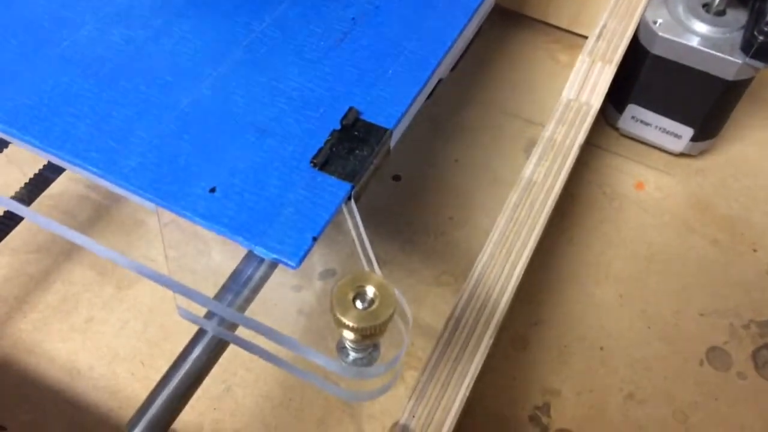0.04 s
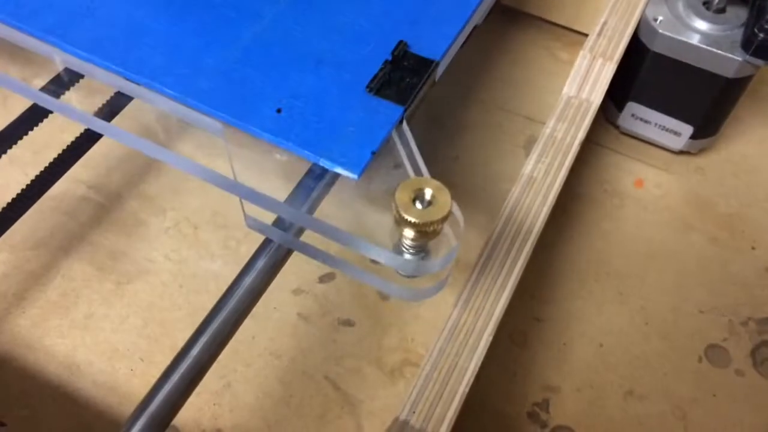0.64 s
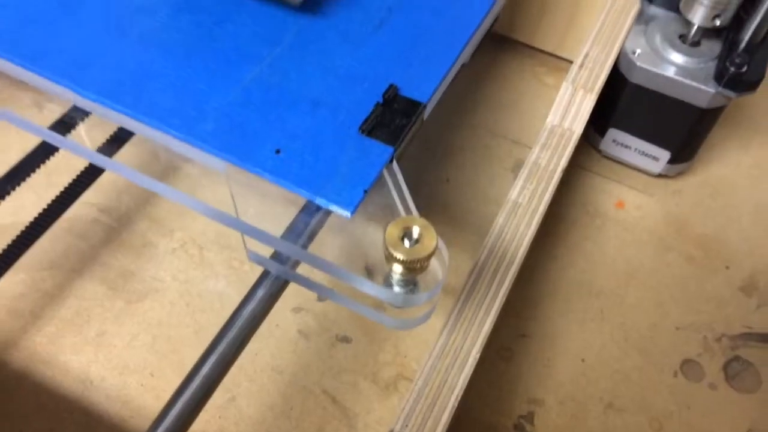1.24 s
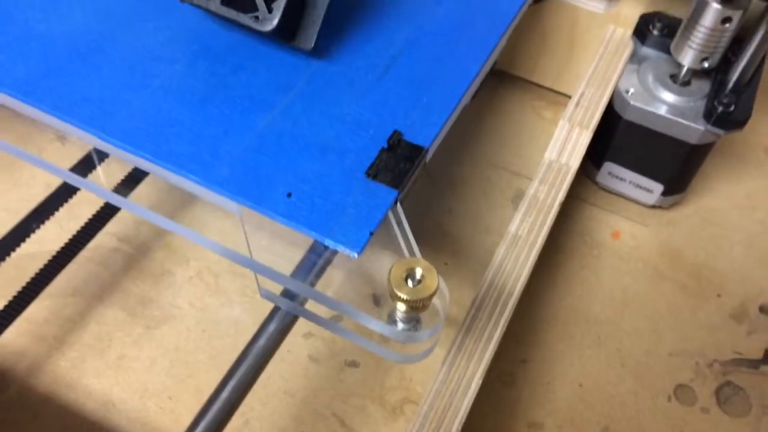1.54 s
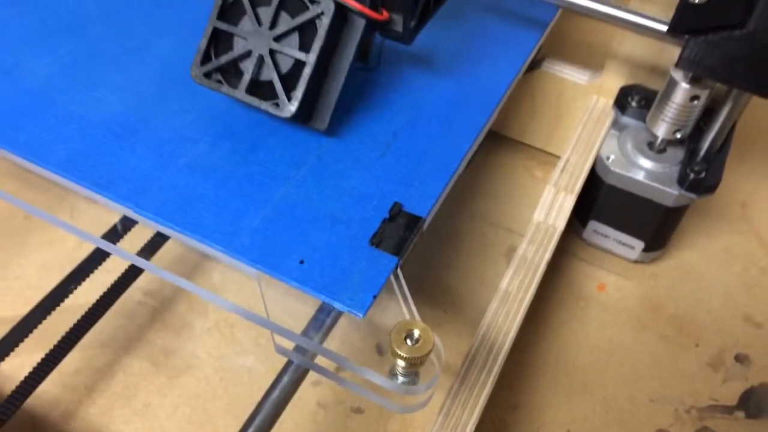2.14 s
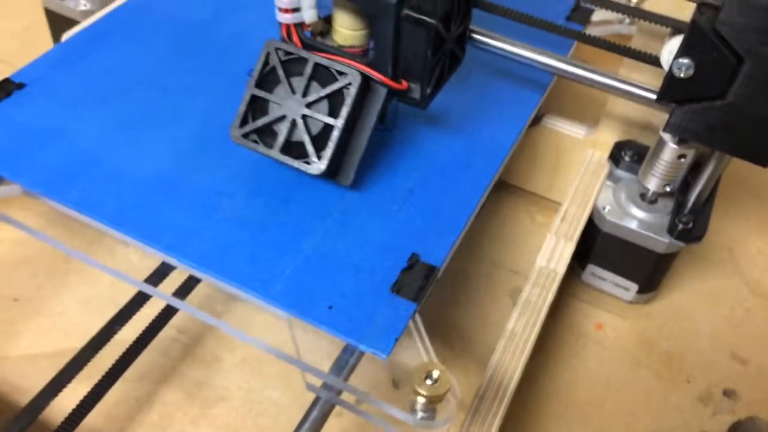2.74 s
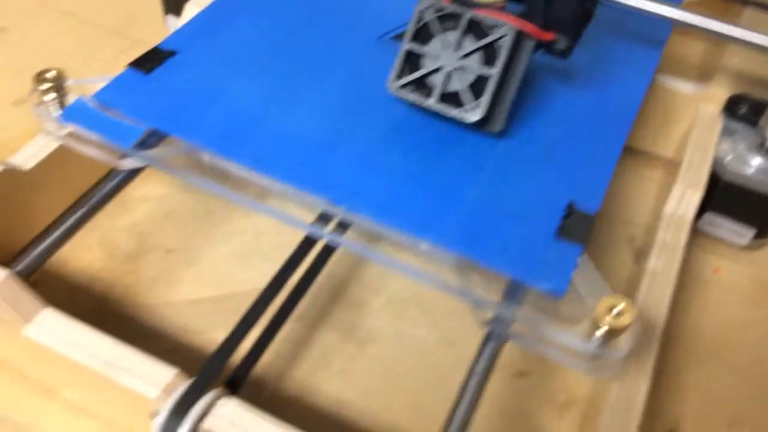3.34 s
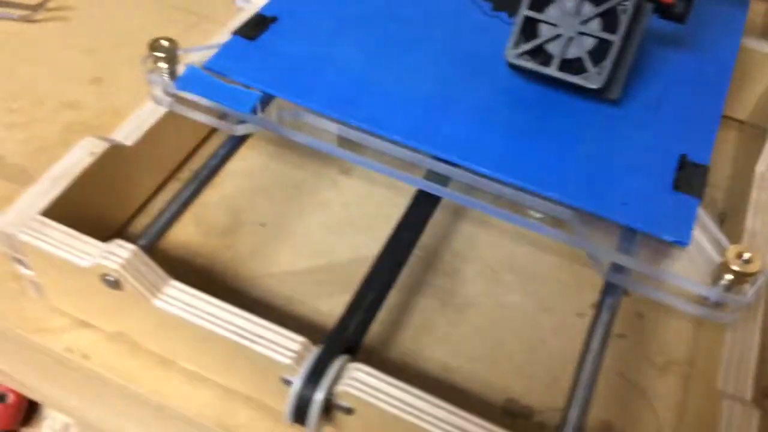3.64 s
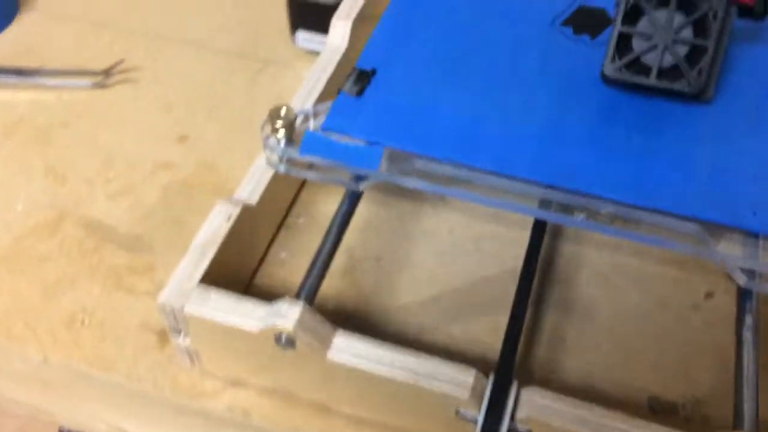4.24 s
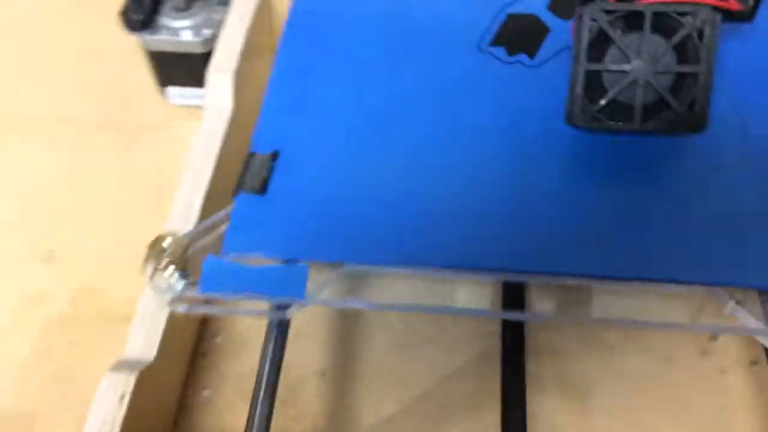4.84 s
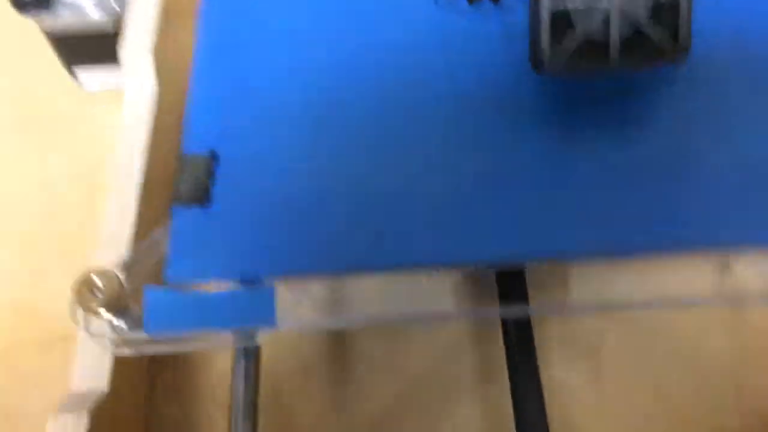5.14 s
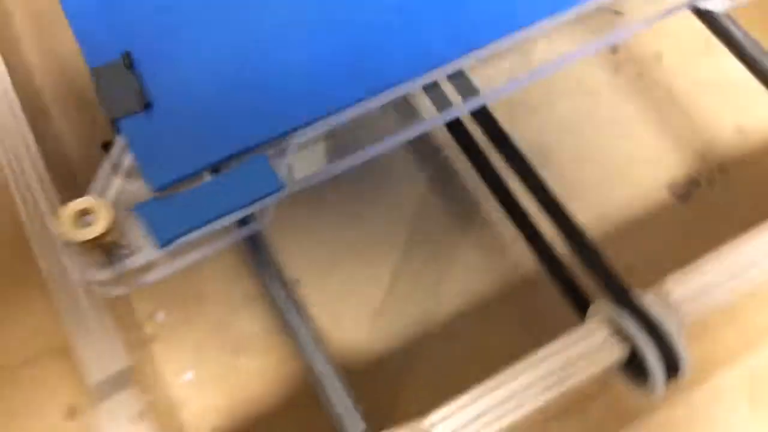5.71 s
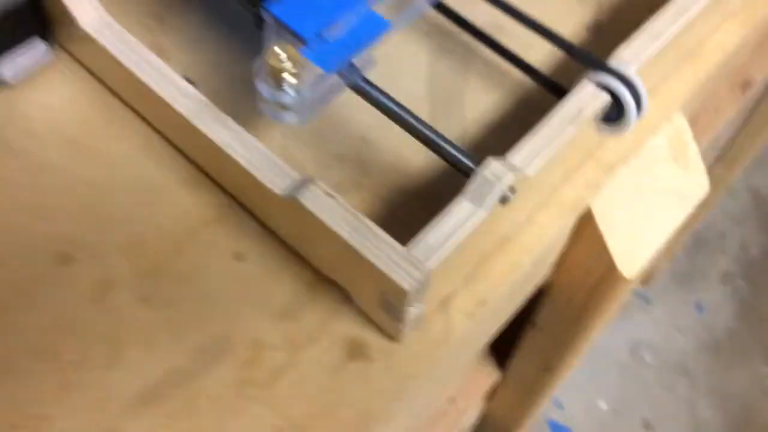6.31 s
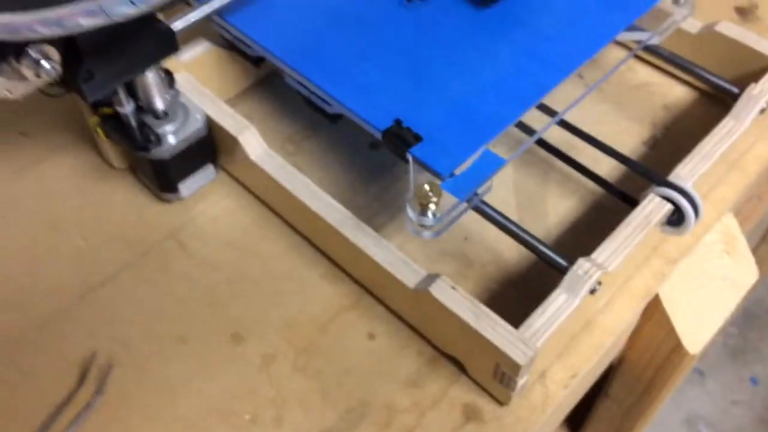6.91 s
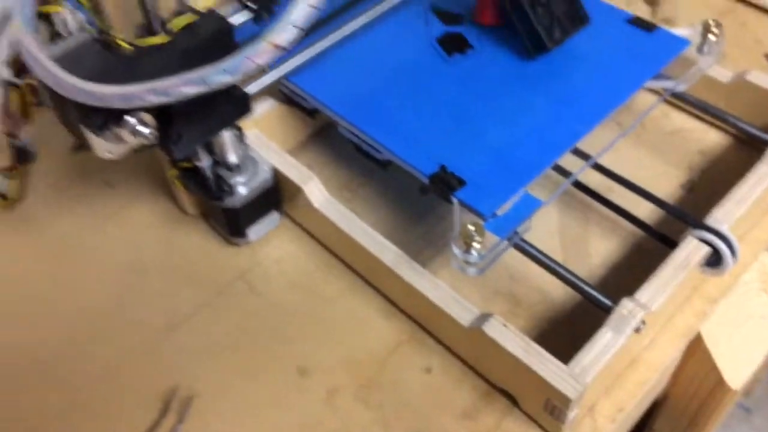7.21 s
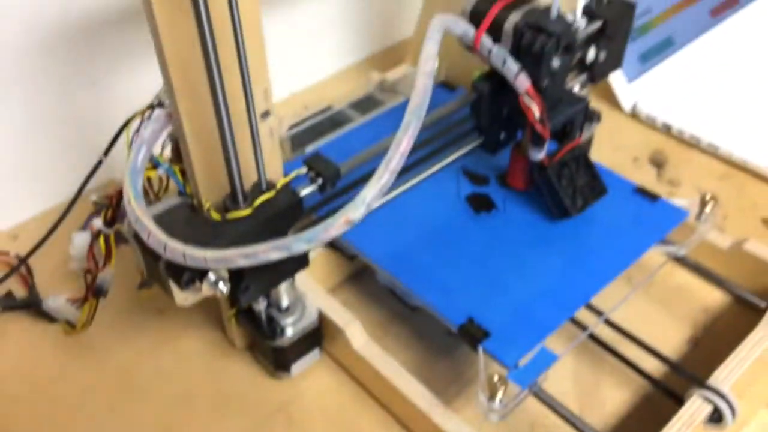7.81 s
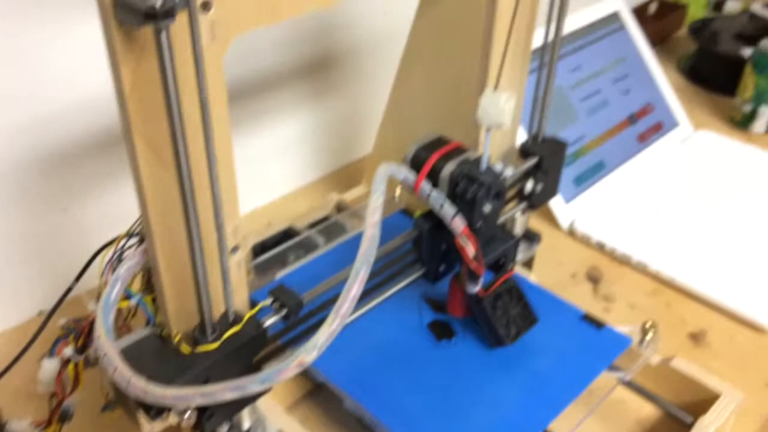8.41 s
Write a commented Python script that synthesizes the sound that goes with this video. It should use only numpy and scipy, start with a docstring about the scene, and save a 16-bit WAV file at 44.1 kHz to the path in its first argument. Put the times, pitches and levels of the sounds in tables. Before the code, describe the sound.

A 3D printer buzzes briefly, then its motors whine and hum in lengthening strokes with small knocks over a whistling fan.

```python
"""A home-built 3D printer buzzes through one fast move, then whines and hums in ever longer strokes.
Its motors turn in tiny steps: the steps make the whine, their unevenness makes the hum, and every
corner jolts the plywood frame. A small fan whistles throughout, and the motor coils join in.
Something in the workshop scrapes once and later clatters. The sounds swell and fade over a soft
rumble as the microphone is carried around the printer."""
import sys
import numpy as np
from scipy import signal
from scipy.fft import rfft, irfft, next_fast_len
from scipy.io import wavfile

SR = 44100
rng = np.random.default_rng(int(sys.argv[2]) if len(sys.argv) > 2 else 0)


def int16_out(signal):
    """Quantize to a 16-bit WAV file."""
    q = np.round(np.clip(np.atleast_2d(signal).T, -1, 1) * 32767)
    wavfile.write(sys.argv[1], SR, q.astype(np.int16))


N = 377496
TIME = np.arange(N) / SR

# How the motor whine swells and fades as the listener moves: time_s, level_db
WHINE_LEVELS = [(1.4, -43.5), (3.2, -47.5), (3.5, -51.5), (3.65, -57.5), (4.4, -50.5), (5.85, -41.5),
                (6.9, -48), (7.35, -46), (8.1, -57.5), (8.45, -53.5)]
# Strokes end by turns in a sideways hop (corner 0) and a plain reversal (corner 1), each with a pause.
PAUSES_S = (.05725, .04617)


def amp(db):
    """Turns decibels into a number to multiply a sound by."""
    return np.exp(np.asarray(db) * np.log(10) / 20)


def unit(x):
    """Scales a sound to an average strength (rms) of 1."""
    return x / np.sqrt(np.mean(x ** 2) + 1e-20)


def curves(rows):
    """Joins a table's points with straight lines: one curve for each column after the time."""
    times, *columns = np.transpose(rows)
    return [np.interp(TIME, times, column) for column in columns]


def value_at(points, hz):
    """Looks up a pitch in a table, blending between rows on a musical (log) scale."""
    pitches, values = np.transpose(points)
    return np.interp(np.log(hz + 1), np.log(pitches + 1), values)


def noise(colour):
    """Noise of strength 1; its colour says how strong the pitches are next to each other."""
    size = next_fast_len(N)
    spectrum = rfft(rng.standard_normal(N), size)
    gains = amp(value_at(colour, np.fft.rfftfreq(size, 1 / SR)))
    return unit(irfft(spectrum * gains, size)[:N])


def drift(rate_hz):
    """A random wobble of strength 1, up to about the given speed."""
    stride = 32
    white = rng.standard_normal(N // stride + 2)
    hz = np.fft.rfftfreq(len(white), stride / SR)
    slow = irfft(rfft(white) / (1 + (hz / rate_hz) ** 2), len(white))
    return unit(np.interp(np.arange(N) / stride, np.arange(len(slow)), slow))


def angle(hz):
    """The growing angle (phase) whose sine is a tone of this pitch."""
    return 2 * np.pi * np.cumsum(hz * np.ones(N)) / SR


def gate(start, end, ramp_s):
    """Switches on between two times, with short fades."""
    return np.clip(np.minimum(TIME - start, end - TIME) / ramp_s + .5, 0, 1)


def add(mix, start_s, sound):
    """Mixes a sound in at a given time."""
    part = mix[round(start_s * SR):][:len(sound)]
    part += sound[:len(part)]


def room(x, echo_db):
    """Adds the workshop's echo, in which each pitch dies away at its own speed."""
    # Time the echo takes to fall by 60 dB: pitch_hz, fade_s
    fade_times = [(100, 0.5), (500, 0.38), (2000, 0.3), (6000, 0.38), (14000, 0.31)]
    hz, t, spectrum = signal.stft(rng.standard_normal(SR // 2), SR, nperseg=256)
    fade = amp(-60 * t / value_at(fade_times, hz)[:, None])
    tail = signal.istft(spectrum * fade, SR, nperseg=256)[1]
    tail[:SR // 300] = 0  # the echo arrives a moment late
    return x + amp(echo_db) * signal.fftconvolve(x, tail / np.linalg.norm(tail))[:N]


def rumble(steady_db=-64.5, rise_s=.03, fade_s=.9):
    """Carrying the microphone makes a deep, soft noise with a few bumps."""
    # Handling bumps: start_s, level_db
    bumps = [(5.15, -59), (5.3, -53), (6.08, -52), (6.83, -56), (7.28, -53)]
    level = amp(steady_db)
    for start, db in bumps:
        t = np.maximum(TIME - start, 0)
        level = level + np.minimum(t / rise_s, 1) * amp(db - 60 * t / fade_s)
    return level * noise([(20, -36), (60, 1.5), (120, -3.0), (400, -17.5), (3000, -74)])


def air(swell_db=0.93):
    """Air rushes through the fan, with a fine hiss on top."""
    # Loudness of the moving air: time_s, rush_db, hiss_db
    air_levels = [(0, -48.5, -62.5), (3.8, -53.5, -63.5), (5.3, -53, -61.5), (6.25, -52, -64.5),
                  (6.8, -55.5, -65.5), (8.5, -56, -65.5)]
    # Colour of the rush: pitch_hz, level_db
    rush_colour = [(25, -43), (45, -20), (65, -1.5), (110, 3), (220, 7.5), (330, -2.5), (780, -7),
                   (1000, -5.5), (1900, -4.5), (2800, -8.5), (3700, -10.5), (4400, -20), (15000, -45)]
    # Colour of the hiss: pitch_hz, level_db
    hiss_colour = [(1500, -41), (4000, 3.5), (5500, 0.5), (7000, -1), (10000, -1.5), (13000, -3),
                   (15500, -9)]
    rush_db, hiss_db = curves(air_levels)
    rush = amp(rush_db + swell_db * drift(8.9)) * noise(rush_colour)
    hiss = amp(hiss_db + drift(16)) * noise(hiss_colour)
    return rush + hiss


def rubs(pitch_hz=2400, sag_hz=219.7, width_hz=100, waver_hz=40):
    """Faint rubbing: a narrow band of noise that sinks in pitch during each rub."""
    # Rubs: start_s, length_s, level_db
    rub_events = [(0.99, .12, -50), (6.602, 0.32, -61), (7.202, 0.39, -60.5), (7.7, 0.58, -61),
                  (8.279, .5, -60)]
    level, hz = np.zeros(N), pitch_hz + waver_hz * drift(14)
    for start, length, db in rub_events:
        progress = np.clip((TIME - start) / length, 0, 1)
        level += amp(db) * np.sin(np.pi * progress)
        hz -= sag_hz * progress * (progress < 1)
    phase = angle(hz)
    return level * (drift(width_hz) * np.sin(phase) + drift(width_hz) * np.cos(phase))


def electronics(whistle_hz=3919.3):
    """The powered motor coils whistle at one pitch, and thin, high tones sound above it."""
    # The whistle jumps up as the motors take a new position: time_s, level_db
    whistle_levels = [(1.04, -77), (1.06, -64), (2.95, -57.5), (3.4, -65), (3.7, -80), (5.0, -59.5),
                      (7.25, -70), (8.45, -67)]
    # Thin high tones, the lowest at seven times the blade pitch: pitch_hz, level_db
    thin_tones = [(6783, -82), (11760, -89), (12021, -88), (14195, -86)]
    phase = angle(whistle_hz)
    whistle = amp(4 + 0.26 * drift(8.7)) * np.sin(phase)
    whistle += amp(-15 + 0.84 * drift(1.5)) * np.sin(2 * phase)
    thin = sum(amp(db + 2.8 * drift(1.5)) * np.sin(angle(hz)) for hz, db in thin_tones)
    return np.sqrt(2) * (amp(curves(whistle_levels)[0]) * whistle + thin)


def fan(blade_hz=969, wander_hz=2.5, harmonics_db=(1, -8, -20)):
    """The passing blades make a wavering tone with two overtones."""
    # Swell and fade of the blade tone: time_s, level_db
    blade_levels = [(0.05, -58.5), (4.3, -58.5), (4.7, -57.5), (6.35, -66), (8.45, -61.5)]
    hz = blade_hz + wander_hz * drift(0.525) + 1.49 * drift(3.94)
    phase = angle(hz) + 0.076 * drift(40)
    tones = sum(amp(db + 1.8 * drift(11.5)) * np.sin(k * phase) for k, db in enumerate(harmonics_db, 1))
    return np.sqrt(2) * amp(curves(blade_levels)[0]) * tones


def scrape(start_s=4.49, rise_s=0.044, hold_s=0.051, fall_s=0.084, level_db=-42.5, grain_db=2.5):
    """Something slides briefly: grainy noise swells, holds and fades."""
    # Colour of the scrape: pitch_hz, level_db
    scrape_colour = [(300, -9), (850, -4), (1230, 3.5), (2300, 3), (3200, -4.5), (5000, -9.5), (7000, -21),
                     (10500, -19), (15000, -26)]
    peak_s = start_s + rise_s
    away_from_peak = np.maximum((peak_s - TIME) / rise_s, (TIME - peak_s - hold_s) / fall_s)
    level = amp(level_db - 22 * np.clip(away_from_peak, 0, 10))
    grains = unit(noise(scrape_colour) * amp(grain_db * drift(300)))
    return room(level * grains, echo_db=-5)


def clatter(fade_s=0.013, boost_db=5):
    """Hard things touch and barely ring; each click blends a clack with a thinner tick."""
    # Clicks, most of them in one cluster: start_s, level_db, tick_share (0 to 1)
    clicks = [(2.5363, -55, 1), (4.031, -51.5, 0.87), (6.109, -39, 0), (6.114, -36, 0), (6.132, -34, 0.083),
              (6.1361, -42, 0.14), (6.1413, -35.5, 0.083), (6.174, -48, 0.49), (6.267, -46, 0),
              (6.55, -48, 0.69), (6.7507, -59, 0.91)]
    # Colour of the clack: pitch_hz, level_db
    clack_colour = [(300, -20), (1200, -1), (2700, 11), (3500, 5), (4600, 6.5), (6000, -6), (7500, -2),
                    (9000, -11), (15500, -21)]
    # Colour of the tick: pitch_hz, level_db
    tick_colour = [(1500, -20), (5000, 8), (12000, 6), (15500, -17)]
    t = np.arange(SR // 20) / SR
    clack, tick = np.zeros((2, N))
    for start, db, tick_share in clicks:
        contact = amp(db + boost_db - 60 * t / fade_s)
        add(clack, start, (1 - tick_share) * contact)
        add(tick, start, tick_share * contact)
    return room(clack * noise(clack_colour), echo_db=-1.5) + room(tick * noise(tick_colour), echo_db=-9)


def strokes(start=1.312, first_s=.04219, growth_s=.03397, wide_growth_s=.08664, widens_at=9.777):
    """Lists (start_s, end_s, corner) for each stroke; they grow faster once the shape widens."""
    rows = []
    while start < TIME[-1]:
        k = len(rows)
        end = start + first_s + growth_s * min(k, widens_at) + wide_growth_s * max(k - widens_at, 0)
        corner = k % 2
        rows.append((start, end, corner))
        start = end + PAUSES_S[corner]
    return rows


def struck(tones, scatter_db, rise_s=0.008, detune=0.043):
    """One blow rings a part's natural tones, never twice alike; its loud start has strength 1."""
    t = np.arange(SR // 4) / SR
    ring = np.zeros(len(t))
    for hz, db, fade_s in tones:
        louder, sharper, shift = rng.uniform(-1, 1, 3)
        phase = 2 * np.pi * hz * (1 + detune * sharper) * t + np.pi * shift
        ring += amp(db + scatter_db * louder - 60 * t / fade_s) * np.sin(phase)
    ring *= 1 - np.exp(-t / rise_s)
    return ring / np.std(ring[:SR // 30])


def jolts(bump_thud_db=-52, bump_rattle_db=-58, bump_after_s=.13, bump_spread_s=.03):
    """Each jerk rings the frame and shakes the print head's carriage; the motors chatter at corners."""
    # Natural tones of the plywood frame and bed: pitch_hz, level_db, fade_s
    frame_tones = [(97.4, -6, 0.18), (133, 1, 0.073), (178, 0.5, 0.24), (202.9, 2.5, 0.3),
                   (230.4, 6.5, 0.18), (250, -6.5, 0.14), (288, -3, 0.22)]
    # Natural tones of the belts and carriage: pitch_hz, level_db, fade_s
    carriage_tones = [(389.3, -3, 0.17), (481, -2, 0.097), (635, 1, 0.079), (677, 3, 0.076),
                      (971, -4, 0.11), (1288, -3.5, 0.11), (1740, -9, 0.053)]
    # Single knocks of the carriage: start_s, thud_db, rattle_db
    knocks = [(.15, -53, -51), (.328, -37.5, -38.5), (.551, -45, -37), (.811, -45, -51), (.846, -47, -61),
              (1.006, -45, -51.5), (1.045, -43, -61), (1.084, -52, -54), (1.29, -40, -49.5),
              (3.756, -62, -45), (4.716, -59, -46.5), (4.901, -52, -61), (5.184, -44.5, -55),
              (5.54, -46.5, -58), (5.865, -49, -56.5), (6.028, -54, -49), (6.08, -41, -58),
              (6.735, -50, -57), (6.828, -44.5, -62), (6.876, -47, -72), (7.295, -46.5, -55),
              (7.569, -47.5, -56.5), (7.955, -48, -58)]
    # Flurries of tiny moves before the strokes begin: start_s, length_s, level_db
    shuffles = [(0.144, 0.031, -46.5), (0.3, 0.041, -45), (0.547, 0.044, -44.5), (0.997, .1, -52),
                (1.251, 0.061, -45.5)]
    # The jolt after a hop, then after a reversal: delay_s, thud_db, rattle_db, chatter_db
    corners = [(.047, -44.5, -51.5, -52), (.022, -47, -50, -48.5)]
    blows, moves = list(knocks), list(shuffles)
    for start, end, corner in strokes():
        delay, thud_db, rattle_db, chatter_db = corners[corner]
        blows.append((end + delay, thud_db, rattle_db))
        moves.append((end, PAUSES_S[corner], chatter_db))
        # the bearings bump softly soon after each turn
        bump_s = start + bump_after_s + bump_spread_s * rng.uniform(-1, 1)
        blows.append((min(bump_s, end), bump_thud_db, bump_rattle_db))
    thuds, rattles = np.zeros((2, N))
    for start, thud_db, rattle_db in blows:
        add(thuds, start, amp(thud_db) * struck(frame_tones, scatter_db=5))
        add(rattles, start, amp(rattle_db) * struck(carriage_tones, scatter_db=5.5))
    chatter = sum(amp(db) * gate(start, start + length, 0.004) for start, length, db in moves)
    chatter *= noise([(400, -7), (560, -6.5), (665, -9), (820, -11.5), (980, 3.0), (1120, -8.5),
                      (1350, 2), (1600, -5.5), (2300, -10.5), (6000, -34.0)])
    return thuds + room(rattles + chatter, echo_db=-6.5)


def fast_move(start_s=.28, speed_up_s=.079, cruise_s=.19, brake_s=.054, slow_hz=130.3, fast_hz=248.9):
    """A motor speeds up, cruises and brakes; its buzz is higher and louder the faster it runs."""
    # Tones in the buzz: pitch_multiple, level_db
    harmonics = [(1, -10.5), (2, -1.5), (3, -27), (4, -20), (5, -30), (6, -23), (7, -26), (8, -28),
                 (9, -43), (10, -35), (11, -43), (12, -35)]
    # Colour of the bearings rushing along the rods: pitch_hz, level_db
    bearing_colour = [(60, -21), (150, 3), (600, 5), (3000, -5.5), (15000, -21)]
    times = np.cumsum([start_s, speed_up_s, cruise_s, brake_s])
    hz = np.interp(TIME, times, [slow_hz, fast_hz, fast_hz, slow_hz])
    phase = angle(hz) + 0.017 * drift(60)
    buzz = sum(amp(db + 0.94 * drift(23)) * np.sin(k * phase + rng.uniform(0, 2 * np.pi))
               for k, db in harmonics)
    level = amp(-29 + 0.3 * (hz - fast_hz)) * gate(times[0], times[-1], 0.012)
    bearings = amp(-20) * noise(bearing_colour)
    return room(level * (unit(buzz) + bearings), echo_db=-6.5)


def hops(hop_hz=1833, hop_s=0.037, hop_db=-53, octave_db=-17):
    """A motor chirps on brief sideways moves: one alone, then one after every second stroke."""
    whine_db = curves(WHINE_LEVELS)[0]
    swell_db = 0.27 * (whine_db - whine_db.mean())  # hops swell and fade with the whine
    moves = [(.763, 0.044, 1247, -42.5)]  # the lone, slower move: start_s, length_s, pitch_hz, level_db
    moves += [(end, hop_s, hop_hz, hop_db + np.interp(end, TIME, swell_db))
              for _, end, corner in strokes() if corner == 0]
    chirps, wobble = np.zeros(N), .18 * drift(110)
    for start, length, hz, db in moves:
        phase = 2 * np.pi * hz * TIME + wobble
        tone = np.sin(phase) + amp(octave_db) * np.sin(2 * phase)
        chirps += amp(db) * gate(start, start + length, 0.007) * tone
    return room(np.sqrt(2) * chirps, echo_db=-10)


def motor_whine(step_phase, coil_phase):
    """The motor's step pulses make a high tone with many overtones."""
    # Swell and fade of the tone an octave up: time_s, level_db
    octave_levels = [(1.4, -66.5), (1.85, -58.5), (2.75, -69.5), (3.8, -69), (4.25, -57.5), (4.95, -64.5),
                     (5.25, -57.5), (5.55, -68.5), (5.85, -59), (6.6, -60.5), (7.35, -70.5), (8.45, -63.5)]
    # The same for the tone at three times the step rate: time_s, level_db
    third_levels = [(3.1, -75), (3.5, -66), (5.4, -74), (6.8, -65.5), (8.5, -69)]
    # Higher overtones when the whine is loudest: step_rate_multiple, level_db
    overtones = [(4, -73.5), (5, -81.5), (6, -79.5), (7, -77), (8, -80.5), (9, -81), (10, -80.5)]
    whine_db, octave_db, third_db = curves(WHINE_LEVELS) + curves(octave_levels) + curves(third_levels)
    whine = amp(whine_db + 2.5 + 0.33 * drift(50)) * np.sin(step_phase)
    whine += amp(octave_db + 3 + 1.06 * drift(54)) * np.sin(2 * step_phase)
    whine += amp(third_db + 1.5 * drift(3)) * np.sin(3 * step_phase)
    fade_db = 0.32 * (whine_db - whine_db.max())
    for k, db in overtones:
        throb = 1 + 0.097 * k * np.sin(coil_phase + drift(13))  # higher overtones throb more deeply
        whine += amp(db + fade_db + 2 * drift(0.57)) * throb * np.sin(k * step_phase)
    return whine


def motor_hum(coil_phase, trim_db=-0.5, flutter_db=1.44):
    """The steps are uneven over each cycle of current in the coils, which makes a throbbing hum."""
    # Swell and fade of the two main hum tones: time_s, lower_db, upper_db
    hum_levels = [(1.45, -51.5, -53.0), (3.4, -53, -58.5), (5.6, -47.5, -51), (5.75, -46, -52.5),
                  (6.95, -53.5, -51.5), (7.85, -53, -52.5), (8.45, -50, -51)]
    # Weaker tones from the uneven steps: coil_rate_multiple, level_db
    weak_tones = [(2, -68), (3, -66), (6, -59), (8, -65.5), (36, -100), (38, -72)]
    lower_db, upper_db = curves(hum_levels)
    tones = [(4, lower_db), (5, upper_db)]
    tones += [(k, db + upper_db - upper_db.mean()) for k, db in weak_tones]
    hum = np.zeros(N)
    for k, db in tones:
        level = amp(db + trim_db + flutter_db * drift(11))
        shift = 1.1 * k * k  # bending waves in the frame delay each tone differently
        hum += level * np.cos(k * coil_phase + shift + 0.29 * drift(13))
    return hum


def zigzag(step_hz=1415.2, steps_per_cycle=32, ring_s=0.024):
    """The motors fill a shape at a steady speed; whine and hum die away at each corner."""
    running = sum(gate(start, end, 0.0031) for start, end, _ in strokes())
    decay = np.exp(-1 / (ring_s * SR))
    ringing = signal.lfilter([1 - decay], [1, -decay], running)  # the frame takes a moment to follow
    step_phase = angle(step_hz) + 0.067 * drift(70)
    coil_phase = step_phase / steps_per_cycle
    whine = motor_whine(step_phase, coil_phase) * running * (1 + ringing) / 2
    hum = motor_hum(coil_phase) * ringing
    return np.sqrt(2) * (whine + hum)


def scene():
    """The printer and the workshop sounds, mixed into one channel."""
    printer = zigzag() + hops() + fast_move() + jolts() + fan() + electronics() + air()
    return (printer + rubs() + rumble() + scrape() + clatter())[None]


def record(dry):
    """Cuts away the very highest treble."""
    lowpass = signal.firwin(1023, cutoff=15330, window=("kaiser", 9), fs=SR)
    return signal.oaconvolve(dry, lowpass[None], "same")


dry = scene()
out = record(dry)
int16_out(out)
```